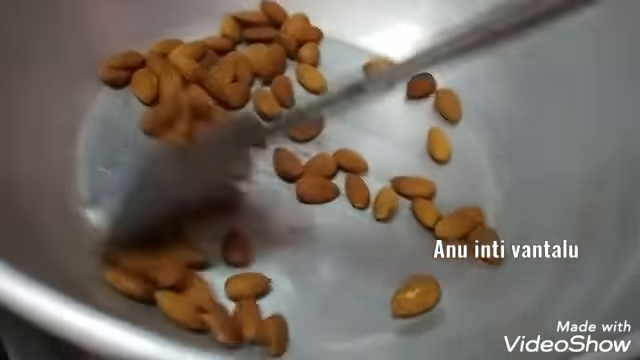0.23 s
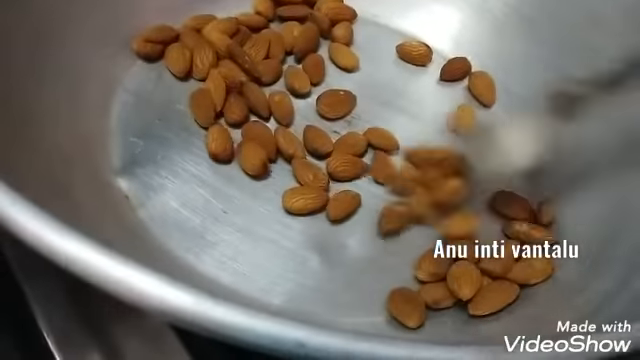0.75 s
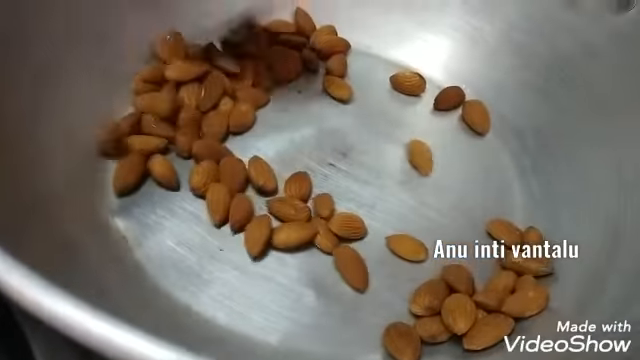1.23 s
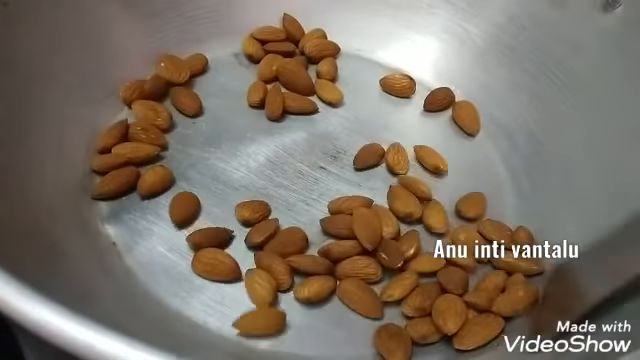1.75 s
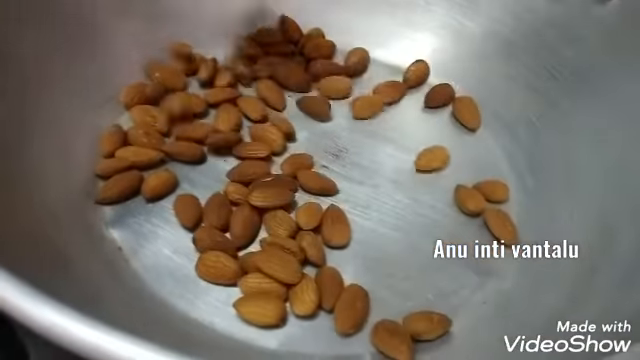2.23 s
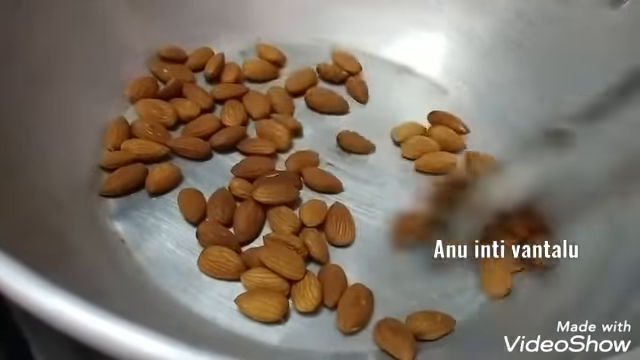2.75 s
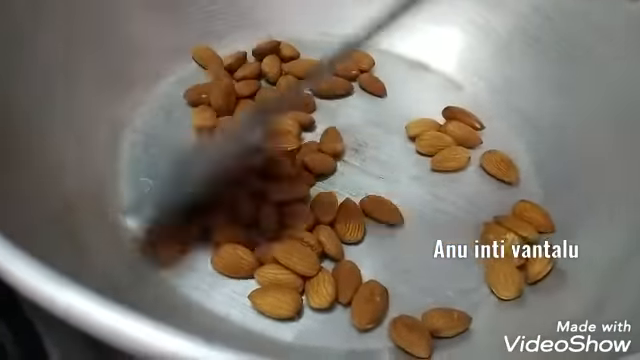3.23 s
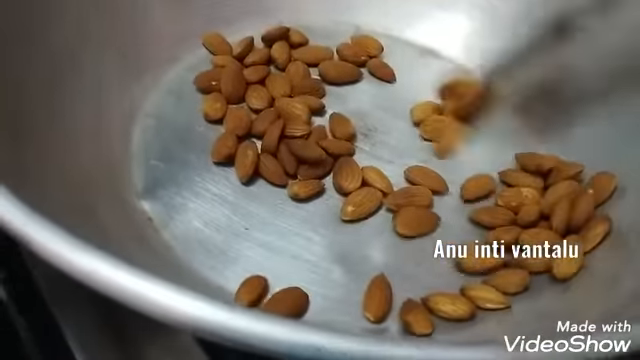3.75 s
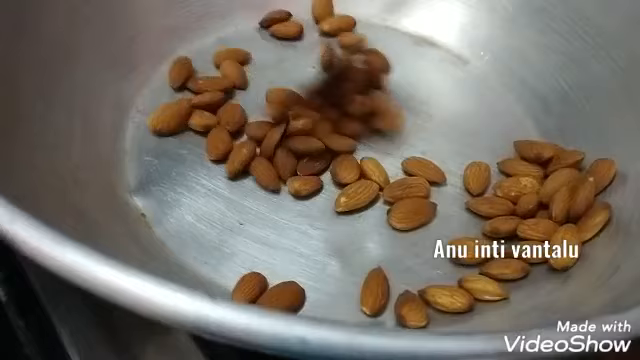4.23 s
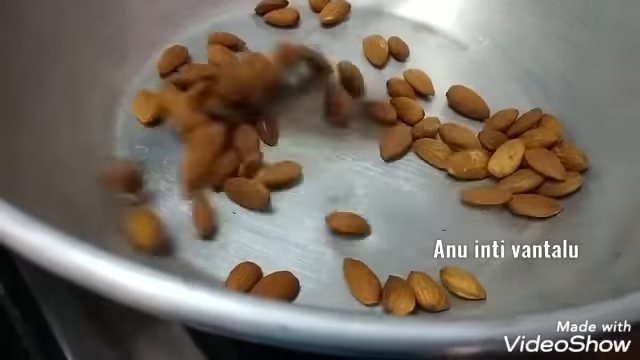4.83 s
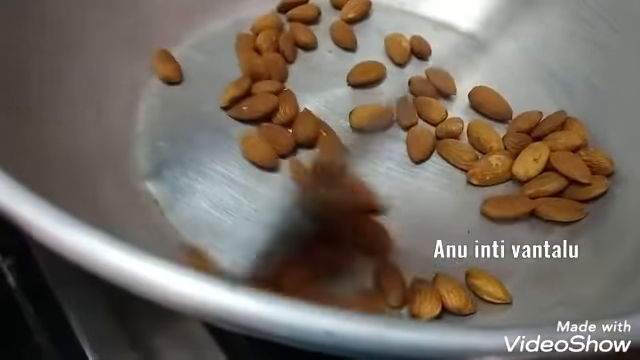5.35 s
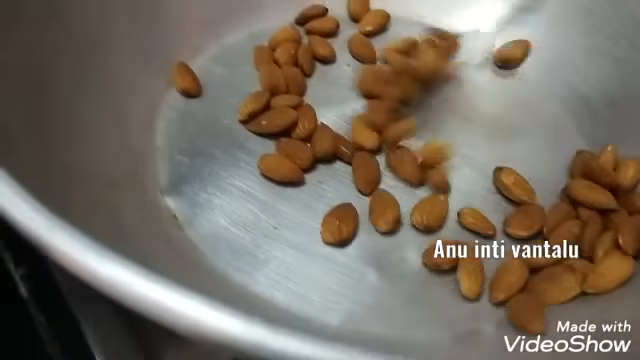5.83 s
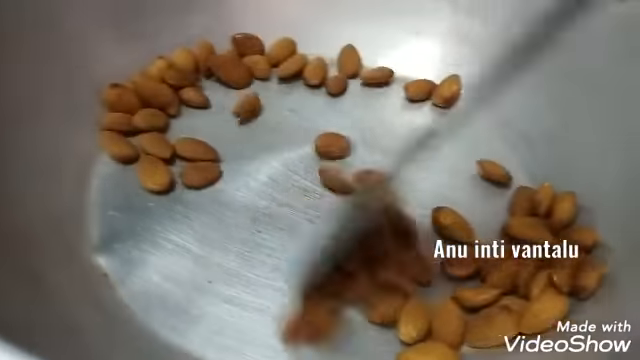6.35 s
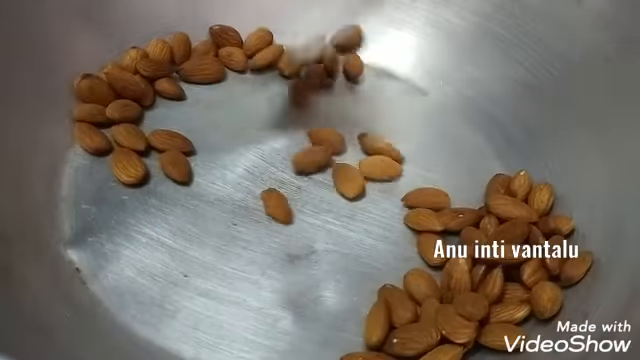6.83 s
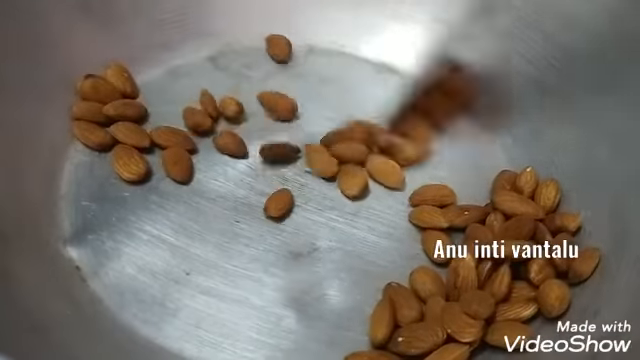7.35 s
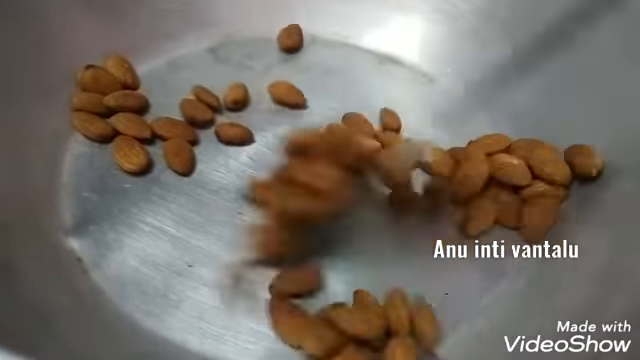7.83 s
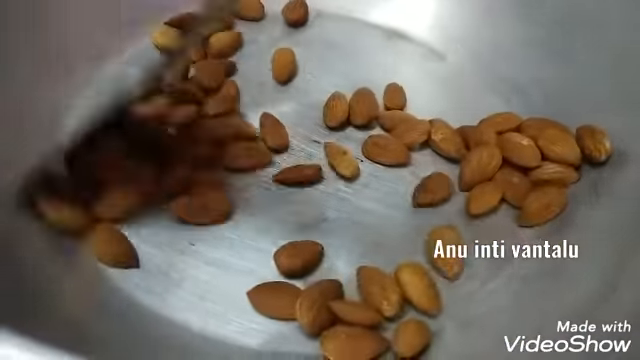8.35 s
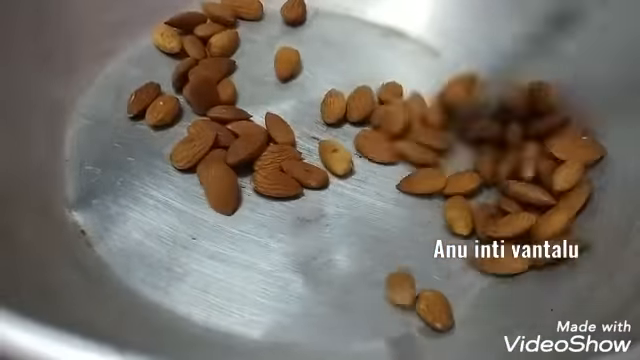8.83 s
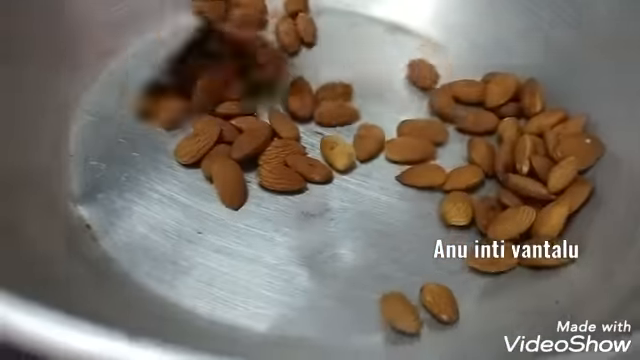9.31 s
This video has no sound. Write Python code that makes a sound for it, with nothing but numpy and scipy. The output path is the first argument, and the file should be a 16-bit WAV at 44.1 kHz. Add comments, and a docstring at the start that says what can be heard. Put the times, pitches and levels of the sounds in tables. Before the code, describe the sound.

Almonds rattle and click around a wide metal pan as a spatula stirs them with scrapes, clinks and dull knocks.

```python
"""Stirring almonds in a pan

A spatula lands in a wide metal pan with a dull knock, scrapes the base and clinks on the wall.
Its thin blade sings where it sticks, and the almonds it pushes tumble and click.
Every contact rings the same pan, heard up close in a small kitchen with a faint hum."""
import sys
import numpy as np
from scipy import signal
from scipy.fft import rfft, irfft, next_fast_len
from scipy.io import wavfile

SR = 44100
rng = np.random.default_rng(int(sys.argv[2]) if len(sys.argv) > 2 else 0)


def to_wav(s):
    """Save 16-bit WAV."""
    ch = np.atleast_2d(s).T  # columns
    pcm = np.round(np.clip(ch, -1, 1) * 32767)  # PCM
    wavfile.write(sys.argv[1], SR, pcm.astype(np.int16))


N = 422478
TOP_HZ = 16000
SOUND_TIME = np.arange(SR // 2) / SR  # the half second that one short sound gets
HAND_TIME = np.arange(0, N / SR, .001)  # the hand's moves, in millisecond steps


# The tone of a soft blow, before hardness shifts it up or down: (frequency [Hz], level [dB])
KNOCK_TONE = [(30, -38), (90, -32), (140, -21), (180, -10.5), (260, -9.5), (340, -6), (480, -1), (680, 1),
              (880, -4), (1150, -15), (2000, -27), (4000, -41), (9000, -55), (16000, -76)]
# The spatula lands on the base: (time [s], level [dB], first rebound [dB], hardness [ratio])
LANDINGS = [(.089, -5.5, -8, 1.05), (.113, -12, -9, .9), (.15, -7, -14, 1), (.165, -6, -14, 1.1),
            (.175, -6, -8, 1.3), (1.432, -10.5, -12, .92), (1.484, -21, -8, .9), (1.956, -24, -6, 1),
            (2.029, -14, -11, .95), (2.432, -4.5, -12, 1.12), (3.283, -6, -11, .97), (3.94, -18, -10, .9),
            (4.271, -3, -12, 1.03), (4.813, -5, -10, 1.08), (4.827, -5.5, -11, 1.08),
            (4.838, -11, -12, 1.1), (4.996, -20, -6, 1), (5.944, -18, -9, .7), (6.46, -14, -7, 1),
            (6.874, -26, -10, .9), (7.309, -4.5, -11, 1.05), (7.376, -21, -10, .7), (7.84, -25, -8, 1),
            (8.026, -15.5, -10, 1), (8.327, -4.5, -12, 1.05), (9.385, -6, -8, 1)]

def spatula_knocks():
    """The flat blade lands softly and rebounds a few times, waking the pan's low notes."""
    track = np.zeros(N)
    for start, db, rebound_db, hardness in LANDINGS:
        thud = tone_filter([(hz * hardness, level) for hz, level in KNOCK_TONE])
        blows = bounces(gap_s=.011, first_db=rebound_db, loss_db=3, count=4)
        ring = pan_ring(tick_db=7.5, notes_db=-7.5)
        add(track, start, convolve(convolve(blows, thud), ring), db)
    return track


# The bright tone of metal on metal: (frequency [Hz], level [dB])
CLINK_TONE = [(60, -38.5), (300, 6.5), (900, 16.5), (1700, 10), (2500, 20), (3600, 13.5), (4900, 16),
              (6200, 13.5), (8700, 15.5), (10000, 1.5), (12000, -9.5), (16000, -33)]
# The edge hits the wall: (time [s], level [dB], fade time of the chatter [s])
WALL_HITS = [(0.091, -26, 0.039), (0.405, -23.5, 0.31), (0.941, -18, 0.22), (0.953, -20.5, 0.31),
             (1.046, -18.5, 0.068), (1.21, -18, 0.075), (1.238, -15, 0.02), (1.246, -9.5, 0.038),
             (1.431, -28, 0.073), (1.483, -17, 0.08), (1.954, -9, 0.24), (2.314, -13, 0.19),
             (2.325, -17, 0.064), (2.433, -18, 0.13), (2.68, -15.5, 0.036), (3.029, -21.5, 0.1),
             (3.284, -22, 0.051), (3.799, -22.5, 0.066), (3.932, -16.5, 0.088), (4.152, -16, 0.031),
             (4.272, -18, 0.037), (4.767, -22.5, 0.07), (4.813, -15.5, 0.35), (5.164, -9.5, 0.26),
             (5.304, -13, 0.042), (5.504, -29, 0.19), (5.941, -21, 0.19), (6.408, -27, 0.19),
             (6.478, -22, 0.089), (6.64, -23.5, 0.087), (6.873, -17.5, 0.093), (7.298, -44, 0.053),
             (7.82, -14, 0.15), (7.841, -10, 0.063), (8.227, -18.5, 0.57), (8.277, -16, 0.032),
             (8.666, -15.5, 0.35), (9.231, -32.5, 0.048), (9.302, -32, 0.044)]

def spatula_clinks(grit_db=5, touch_db=9):
    """The metal edge strikes the pan's wall and chatters briefly along it."""
    track, edge = np.zeros(N), tone_filter(CLINK_TONE)
    for start, db, fade_s in WALL_HITS:
        noise = rng.standard_normal(len(SOUND_TIME))
        chatter = noise * uneven_gains(len(noise), grit_db) * fade(fade_s)
        chatter[0] = amp(touch_db) * np.abs(chatter).max()  # the first touch is the hardest
        ring = pan_ring(tick_db=-4, notes_db=-5)
        add(track, start, convolve(convolve(chatter, edge), ring), db)
    return track


# The bare edge drags over the metal: (time [s], length [s], start level [dB], end level [dB])
DRAGS = [(0.087, 0.11, -31, -33), (0.31, 0.098, -47.5, -53), (0.54, .19, -51, -51),
         (0.743, 0.014, -48, -35.5), (0.936, 0.11, -40, -34), (1.233, 0.13, -32, -48.5),
         (1.437, 0.17, -39, -34), (1.709, 0.024, -36, -57), (1.952, 0.11, -41, -26.5),
         (2.315, 0.023, -36, -41), (2.441, 0.027, -36, -34), (2.536, 0.1, -36, -48),
         (2.675, 0.22, -31.5, -39.5), (2.871, 0.054, -63, -30.5), (3.017, 0.019, -48, -62),
         (3.281, 0.21, -35, -37), (3.548, 0.06, -43, -42), (3.935, 0.039, -64, -53),
         (4.244, 0.24, -35, -48), (4.499, 0.058, -33, -62), (4.71, 0.012, -45, -52),
         (4.758, 0.11, -44, -28.5), (5.053, 0.1, -33, -41), (5.271, 0.09, -45.5, -33.5),
         (5.57, 0.04, -43, -28.5), (5.65, 0.09, -69, -41), (5.95, 0.015, -39, -27), (6.408, 0.1, -57, -56),
         (6.871, 0.033, -23, -33), (7.295, 0.031, -38, -33), (7.387, 0.2, -36, -29),
         (7.816, 0.18, -40.5, -26), (8.037, 0.14, -43, -43.5), (8.238, 0.097, -68, -30),
         (8.458, 0.29, -39, -28.5), (8.864, 0.16, -48, -56), (9.383, 0.069, -35.5, -36.5)]

def rubbing_strength(heap_level, lift_s=.24, graze_db=-21):
    """How hard the blade rubs: its drags, plus a light graze under the moving nuts."""
    drag_power = sum(hand_stroke(*drag, lift_s) ** 2 for drag in DRAGS)
    graze = amp(graze_db) * heap_level
    return np.sqrt(curve(np.c_[HAND_TIME, drag_power]) + graze ** 2)


# The tone of the edge slipping on metal: (frequency [Hz], level [dB])
SCRAPE_TONE = [(60, -14.5), (250, 0.5), (700, 17), (2600, 10.5), (3600, 7), (4900, 13.5), (6200, 7.5),
               (7500, 12), (7900, 8), (8500, 14.5), (10000, -2), (12000, -11), (16000, -18)]

def spatula_scrape(level, slips_per_s=500, spots=5, changes_per_s=12):
    """The edge catches on the metal's grain in tiny slips, wandering from spot to spot."""
    track, edge = np.zeros(N), tone_filter(SCRAPE_TONE)
    shares = signal.resample(rng.standard_normal((spots, changes_per_s * N // SR)), N, axis=1)
    for share in shares / np.linalg.norm(shares, axis=0):
        ring = convolve(pan_ring(tick_db=-2.5, notes_db=-8), edge)
        slips = level * share * random_taps(slips_per_s, scatter_db=6)
        track += convolve(slips, ring / np.linalg.norm(ring))
    return track


def edge_sizzle(edge, rub_level, heap_level, bare_db=8, muffling=.51):
    """A bare edge sizzles in the highest treble; burying it in nuts muffles that."""
    bareness = rub_level / (rub_level + heap_level)
    treble_gain = amp(bare_db) * bareness ** muffling
    treble = signal.sosfiltfilt(signal.butter(12, 9830, "high", fs=SR, output="sos"), edge)
    return edge + (treble_gain - 1) * treble


# The blade's own notes: (pitch [Hz], level [dB], fade time [s])
BLADE_NOTES = [(2186, 0, .2), (2420, 2, .11), (2545, 0, .11), (2905, -2, .1), (3225, -3, .13),
               (4300, -5, .12), (4550, -7, .1), (4790, -5, .13), (5190, -5, .12), (6020, -12, .1),
               (7230, -8, .12), (8250, -7, .07), (8550, -3, .07), (9040, -8, .07)]
# The edge sticks: (time [s], level [dB], leading note [Hz], fade time of slips [s], other notes [dB])
STICKS = [(.146, -23, 4790, .2, -8), (.313, -39, 3225, .1, -12), (.765, -35, 2545, .06, -6),
          (1.957, -10.5, 8550, .08, -5), (2.018, -20, 2545, .15, -7), (2.69, -28, 7230, .25, -3),
          (2.887, -27, 2186, .1, -14), (3.325, -25, 2905, .2, -14), (3.935, -28, 2420, .1, -3),
          (4.312, -21, 2905, .07, -13), (4.768, -22, 2420, .05, -3), (5.165, -18, 4790, .1, -9),
          (5.31, -26, 2905, .12, -5), (6.873, -20, 3225, .1, -1), (7.29, -17, 2905, .03, -11),
          (7.35, -31, 3225, .2, -6), (7.48, -27, 4790, .15, -5), (7.54, -23, 5190, .15, -4),
          (7.838, -19, 2186, .25, -7), (7.86, -28, 4300, .2, -5), (7.925, -26, 2420, .15, -9),
          (8.428, -29, 2905, .2, -8), (9.452, -25, 2545, .12, -11)]

def blade_singing(lead_octaves=.06):
    """Sticking and slipping makes the blade ring; where it is pressed decides which note leads."""
    track = np.zeros(N)
    for start, db, lead_hz, fade_s, others_db in STICKS:
        slips = rng.standard_normal(len(SOUND_TIME)) * fade(fade_s)
        singing = np.zeros(len(SOUND_TIME))
        for hz, note_db, ring_s in BLADE_NOTES:
            lead = np.exp(-(np.log2(hz / lead_hz) / lead_octaves) ** 2)  # close notes sing along
            bent_hz = hz * (1 + .004 * rng.normal())
            sharpness = np.pi * hz * ring_s / np.log(1000)
            note = signal.lfilter(*signal.iirpeak(bent_hz, sharpness, fs=SR), slips)
            singing += max(lead, amp(note_db + others_db)) * note / rms(note)
        add(track, start, singing, db)
    return track


# Single nuts hit the metal: (time [s], level [dB], hollow pitch [Hz])
NUT_HITS = [(.002, -17, 1140), (.681, -19.5, 790), (.894, -40, 668), (.916, -21, 754), (0.941, -6, 657),
            (1.002, -10.5, 730), (1.047, -7.5, 673), (1.068, -16.5, 750), (1.148, -17, 1100),
            (1.212, -11, 958), (1.244, -25, 1510), (1.315, -16.5, 1510), (1.456, -18, 1126),
            (1.552, -19, 1170), (1.613, -16.5, 1174), (1.705, -10.5, 804), (1.717, -15, 1156),
            (1.923, -22, 760), (2.022, -15.5, 1970), (2.12, -16, 1910), (2.164, -11.5, 806),
            (2.18, -16, 760), (2.227, -8, 770), (2.245, -9, 1110), (2.313, -13.5, 820), (2.48, -14.5, 1530),
            (2.55, -13.5, 1165), (2.618, -16, 1140), (2.939, -15, 754), (3.018, -11.5, 800),
            (3.053, -10, 1140), (3.073, -16, 787), (3.113, -19.5, 1130), (3.157, -26, 664),
            (3.562, -24, 740), (3.583, -22, 684), (3.643, -18, 763), (3.662, -22, 647), (3.733, -22, 767),
            (3.882, -23, 760), (3.8, -15, 767), (3.939, -11.5, 1580), (4.016, -14, 1115),
            (4.046, -8.5, 1100), (4.094, -12, 1050), (4.15, -26, 670), (4.415, -13, 666),
            (4.441, -18, 1100), (4.516, -10, 652), (4.956, -9, 1640), (4.996, -14, 1060),
            (5.011, -11, 1038), (5.066, -11.5, 1030), (5.092, -13, 1630), (5.121, -27, 1680),
            (5.418, -35, 824), (5.512, -27, 984), (5.676, -18.5, 730), (5.74, -17.5, 1640),
            (5.834, -22.5, 710), (6.054, -19, 1030), (6.072, -19, 1090), (6.09, -12.5, 1086),
            (6.115, -13.5, 1060), (6.165, -14, 1085), (6.268, -21, 746), (6.322, -26, 1210),
            (6.398, -18.5, 560), (6.404, -16.5, 1790), (6.479, -9, 657), (6.565, -18, 700),
            (6.597, -16.5, 560), (6.682, -20, 790), (6.718, -24, 1500), (6.793, -23.5, 745),
            (6.962, -28, 636), (7.023, -19, 1170), (7.203, -34, 740), (7.374, -10, 790),
            (7.546, -11.5, 1010), (7.659, -19.5, 1156), (7.95, -17, 733), (8.002, -14, 650),
            (8.117, -5.5, 946), (8.218, -15.5, 1100), (8.41, -20.5, 674), (8.472, -14.5, 2270),
            (8.532, -13.5, 856), (8.571, -12, 660), (8.668, -14, 790), (9.03, -26, 880), (9.086, -20, 1790),
            (9.136, -18, 1040), (9.157, -13.5, 880), (9.18, -12.5, 1077), (9.301, -22.5, 800),
            (9.498, -25, 980), (9.54, -24, 687)]

def nut_clicks():
    """Flung nuts strike the pan one by one; each rocks from end to end as it lands."""
    track = np.zeros(N)
    for start, db, hz in NUT_HITS:
        rocking = bounces(gap_s=.003, first_db=-7, loss_db=3, count=2)
        add(track, start, convolve(rocking, one_nut(hz, tick_db=-18.5)), db)
    return track


# The blade shoves the nuts: (time [s], length [s], top level [dB], fade time [s], middle pitch [Hz])
HEAP_SHOVES = [(0, 0.00072, -23, 0.19, 1160), (.12, 0.043, -24.5, 0.6, 770),
               (0.407, 0.033, -33.5, 0.91, 1140), (0.578, 0.099, -32, 0.49, 735),
               (0.894, 0.047, -24.5, 0.25, 686), (.94, 0.0082, -25.5, 0.48, 696),
               (1.002, 0.013, -22.5, 0.35, 744), (1.045, 0.025, -21, 0.54, 750),
               (1.209, 0.011, -25, 0.59, 1300), (1.456, 0.027, -20.5, 0.18, 1310),
               (1.548, 0.089, -23.5, 0.49, 1190), (1.703, 0.0029, -25, 0.25, 1140),
               (2.021, 0.032, -31, 0.92, 1260), (2.11, 0.17, -22, 0.18, 1200),
               (2.312, 0.017, -21, 0.078, 1320), (2.445, 0.0056, -20, 0.18, 655),
               (2.54, 0.092, -29, 0.17, 1150), (2.878, 0.019, -39.5, 2.1, 770),
               (3.011, 0.021, -23, 0.19, 980), (3.3, 0.047, -32, 1.2, 1200), (3.48, 0.1, -30.5, 0.34, 1020),
               (3.619, 0.093, -30.5, 0.54, 690), (3.879, 0.066, -34, 1.1, 1450),
               (4.016, 0.026, -26.5, 0.37, 1130), (4.272, 0.033, -25, 0.77, 796),
               (4.415, 0.035, -26, 0.64, 850), (4.516, 0.029, -21.5, 0.36, 790),
               (4.803, 0.032, -22.5, 2, 635), (4.961, 0.086, -21.5, 0.44, 1260),
               (5.079, 0.031, -21.5, .5, 1770), (5.3, 0.011, -30.5, 1.6, 1200),
               (5.556, 0.025, -25.5, 0.27, 980), (5.65, 0.025, -33, 0.53, 795),
               (5.829, 0.0046, -31.5, 1.3, 1030), (5.941, 0.011, -31, 1.5, 1030),
               (6.022, 0.17, -29, 0.5, 970), (6.397, 0.03, -21.5, 0.24, 1370),
               (6.44, 0.072, -25.5, 0.95, 750), (6.721, 0.15, -39.5, 1, 770),
               (6.961, 0.062, -33, 0.43, 983), (7.19, 0.025, -46.5, 0.38, 698),
               (7.311, 0.0026, -20.5, 0.19, 720), (7.374, 0.0092, -24, 0.85, 1000),
               (7.5, 0.079, -34.5, 0.44, 970), (7.739, 0.048, -39, 0.26, 814),
               (7.83, 0.01, -41, 0.17, 1274), (7.947, 0.18, -18, .55, 1140),
               (8.218, 0.02, -23.5, 0.54, 1310), (8.42, 0.099, -30, 0.63, 870),
               (8.572, 0.0096, -22, 0.14, 780), (8.65, 0.079, -34, 1.1, 725), (8.88, 0.08, -40.5, 2.3, 960),
               (8.996, 0.087, -28, 0.48, 970), (9.39, 0.18, -31, 0.89, 690)]

def heap_motion(swell_db=6.5, climb_octaves=.37):
    """The heap's level and pitch [octaves]: shoves swell and settle, rising as nuts ride up the wall."""
    power, pitch_sum = 1e-12, 0
    for start, length, db, fade_s, hz in HEAP_SHOVES:
        push = hand_stroke(start, length, db - swell_db, db, fade_s) ** 2
        climb = climb_octaves * np.interp(HAND_TIME, [start, start + 2 * length], [-.5, .5])
        power += push
        pitch_sum += push * (np.log2(hz) + climb)  # the strongest shove counts most
    return curve(np.c_[HAND_TIME, np.sqrt(power)]), curve(np.c_[HAND_TIME, pitch_sum / power])


def nuts_tumbling(level, pitch, taps_per_s=27, crowding=.7, heap_octaves=.3, stray_share=.22):
    """Nuts roll over spots of different pitch; a harder push makes more taps."""
    track = np.zeros(N)
    spots_hz = np.geomspace(640, 2400, 20)
    # spots under the heap are hit hardest; stray nuts reach all the others
    under_heap = np.array([1 / (1 + ((np.log2(hz) - pitch) / heap_octaves) ** 2) for hz in spots_hz])
    shares = under_heap + stray_share
    push = level / np.linalg.norm(shares, axis=0)
    tap_rate = taps_per_s * (level / rms(level)) ** crowding
    for hz, share in zip(spots_hz, shares):
        taps = push * share * random_taps(tap_rate, scatter_db=2)
        track += convolve(taps, one_nut(hz, tick_db=-27))
    return track


# The tone of a nut's tick: (frequency [Hz], level [dB])
NUT_TONE = [(40, -32.5), (150, -24), (380, -20), (560, -1.5), (740, -2), (1100, -8), (1600, 7.5), (2200, 4),
            (2800, 2.5), (3600, -8), (8000, -17), (16000, -107.5)]

def one_nut(hz, tick_db, hollow_db=3, cycles=40, brightness=2.77):
    """A nut on metal makes a tick and a short hollow note; low-pitched spots tick duller."""
    tick = convolve(pan_ring(tick_db, notes_db=-5.5), tone_filter(NUT_TONE))
    tick = signal.sosfilt(signal.butter(1, min(brightness * hz, TOP_HZ), fs=SR, output="sos"), tick)
    note = fading_note(hz, cycles / hz)
    # a small spot gives off no bass
    note = signal.sosfilt(signal.butter(2, hz / 2, "high", fs=SR, output="sos"), note)
    click = tick / rms(tick) + amp(hollow_db) * note / rms(note)
    return click / np.linalg.norm(click)


# The pan's clear notes: (pitch [Hz], level [dB], fade time [s])
PAN_NOTES = [(172.7, 3, 0.19), (336, 3, 0.14), (464.3, 3, 0.12), (569, -0.5, 0.12), (660, 7.5, 0.079),
             (772, 5.5, 0.19), (950, -10, 0.09), (1067, -3.5, 0.14), (1278, -4, 0.21), (1532, -1.5, 0.067),
             (1626.5, -6.5, 0.1), (2082, 6.5, 0.026), (2566, -15.5, 0.27), (2860, -10, 0.048)]
# Its many weak notes, blurred into a shimmer: (frequency [Hz], fade time [s])
PAN_SHIMMER = [(200, 1), (800, 0.093), (2000, 0.074), (8000, 0.038)]

def pan_ring(tick_db, notes_db, scatter_db=3):
    """The struck pan gives a tick, a shimmer and clear notes whose mix differs from spot to spot."""
    notes = np.zeros(len(SOUND_TIME))
    for hz, db, fade_s in PAN_NOTES:
        strength = amp(db + scatter_db * rng.normal()) * rng.choice([-1, 1])
        notes += strength * fading_note(hz, fade_s)
    ring = fading_noise(PAN_SHIMMER) + amp(notes_db) * notes / np.linalg.norm(notes)
    ring[0] += amp(tick_db)
    return ring


# How long the room rings: (frequency [Hz], fade time [s])
ECHO_TIMES = [(150, 0.54), (1000, 0.52), (5000, 0.27), (14000, 0.11)]

def kitchen_echo(sound, turn_s=.35, tails=6):
    """The kitchen's short, smooth echo, blended from several fading tails in turn."""
    turn = np.arange(N) / SR / turn_s
    shares = (np.maximum(1 - np.abs((turn - k) % tails - 1), 0) for k in range(tails))
    return sum(convolve(sound * np.sqrt(share), fading_noise(ECHO_TIMES)) for share in shares)


# The tone of the kitchen's steady rush: (frequency [Hz], level [dB])
RUSH_TONE = [(20, -43), (60, -27), (95, 11), (140, 3.5), (400, 4.5), (1000, -35), (3000, -24), (16000, -33)]
# The low hum swells now and then: (time [s], level [dB])
HUM_LEVELS = [(0, -57), (.7, -67), (.95, -58.5), (1.7, -59), (2.1, -69.5), (6.7, -72.5), (7.0, -59),
              (7.7, -64), (8.1, -67), (9.58, -82)]

def kitchen_background(rush_db=-61, hum_hz=95):
    """A soft rush with a low, slightly unsteady hum."""
    rush = convolve(rng.standard_normal(N), tone_filter(RUSH_TONE))
    drift = np.cumsum(rng.standard_normal(N)) / np.sqrt(SR)
    hum = np.sqrt(2) * np.sin(2 * np.pi * hum_hz * np.arange(N) / SR + 3 * drift)
    return amp(rush_db) * rush / rms(rush) + amp(curve(HUM_LEVELS)) * hum


def hand_stroke(start, length, from_db, to_db, fade_s, grip_s=.00076):
    """One move of the hand: it takes hold, changes evenly in level and dies away."""
    t = HAND_TIME - start
    grip = np.clip(t / grip_s, 0, 1)
    held_db = np.interp(t, [0, length], [from_db, to_db])
    release = np.exp(-np.log(1000) * np.maximum(t - length, 0) / fade_s)
    return grip * amp(held_db) * release


def bounces(gap_s, first_db, loss_db, count):
    """A blow and its ever weaker rebounds at uneven gaps."""
    blows = np.zeros(len(SOUND_TIME))
    blows[0] = 1
    times = np.cumsum(gap_s * rng.uniform(.493, 1.5, count))
    blows[(times * SR).astype(int)] = amp(first_db - loss_db * np.arange(count))
    return blows


def random_taps(per_second, scatter_db):
    """Taps of uneven size at random moments, with an average power of 1."""
    hits = rng.random(N) < per_second / SR
    taps = hits * rng.choice([-1, 1], N) * uneven_gains(N, scatter_db) / np.sqrt(per_second)
    return taps / rms(taps)


def uneven_gains(count, scatter_db):
    """Random strengths scattered around 1."""
    return amp(scatter_db * np.clip(rng.standard_normal(count), -2, 2))


def fade(fade_s):
    """A fall of 60 dB in fade_s seconds: this is what "fade time" means."""
    return np.exp(-np.log(1000) * SOUND_TIME / np.maximum(fade_s, 1e-4))


def fading_note(hz, fade_s):
    """A pure note that dies away."""
    return fade(fade_s) * np.sin(2 * np.pi * hz * SOUND_TIME)


def fading_noise(fade_times):
    """Noise of energy 1 in which each frequency dies at its own speed."""
    hz, t, bands = signal.stft(rng.standard_normal(len(SOUND_TIME)), SR, nperseg=128)
    fade_s = value_at(fade_times, hz)[:, None]
    bands = bands * np.exp(-np.log(1000) * t / fade_s) / np.sqrt(fade_s)
    noise = signal.istft(bands, SR, nperseg=128)[1][:len(SOUND_TIME)]
    return noise / np.linalg.norm(noise)


def tone_filter(tone, size=4096):
    """A short pulse with the given tone; convolve a sound with it to filter that sound."""
    gains = amp(value_at(tone, np.fft.rfftfreq(size, 1 / SR)))
    cepstrum = irfft(np.log(gains))
    # folding the second half onto the first packs the energy at the pulse's start
    cepstrum[1:size // 2] *= 2
    cepstrum[size // 2 + 1:] = 0
    return irfft(np.exp(rfft(cepstrum)))


def value_at(rows, hz):
    """Read between (frequency, value) rows, with octaves evenly spaced."""
    row_hz, values = np.transpose(rows)
    return np.interp(np.log(hz + 1), np.log(row_hz + 1), values)


def curve(rows):
    """Join (time, value) rows into one value per sample."""
    return np.interp(np.arange(N) / SR, *np.transpose(rows))


def convolve(sound, response):
    """Let every sample set off the response, keeping the sound's length."""
    return signal.oaconvolve(sound, response)[:len(sound)]


def add(track, start, sound, db):
    """Put a sound into the track at this time and peak level."""
    part = track[max(round(start * SR), 0):][:len(sound)]
    part += amp(db) * sound[:len(part)] / np.abs(sound).max()


def amp(db):
    """Decibels to gain."""
    return 10 ** (np.asarray(db) / 20)


def rms(sound):
    """Average strength of a sound."""
    return np.sqrt(np.mean(sound ** 2) + 1e-20)


def scene():
    """Spatula and almonds in the pan, with the kitchen's echo and hum."""
    heap_level, heap_pitch = heap_motion()
    rub_level = rubbing_strength(heap_level)
    edge = edge_sizzle(spatula_clinks() + spatula_scrape(rub_level), rub_level, heap_level)
    spatula = spatula_knocks() + edge + blade_singing()
    almonds = nut_clicks() + nuts_tumbling(heap_level, heap_pitch)
    stirring = spatula + almonds
    return (stirring + amp(-4) * kitchen_echo(stirring) + kitchen_background())[None]


def record(dry):
    """The microphone keeps nothing above TOP_HZ."""
    size = next_fast_len(N + SR // 2)
    hz = np.fft.rfftfreq(size, 1 / SR)
    return irfft(rfft(dry, size) * (hz < TOP_HZ), size)[..., :N]


dry = scene()
out = record(dry)
to_wav(out)
```